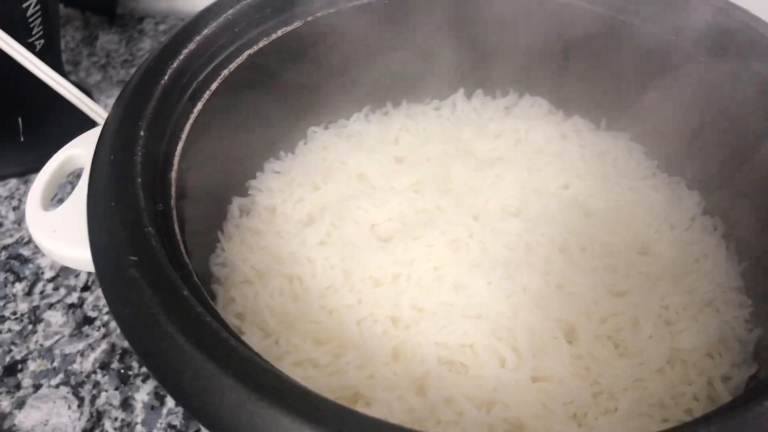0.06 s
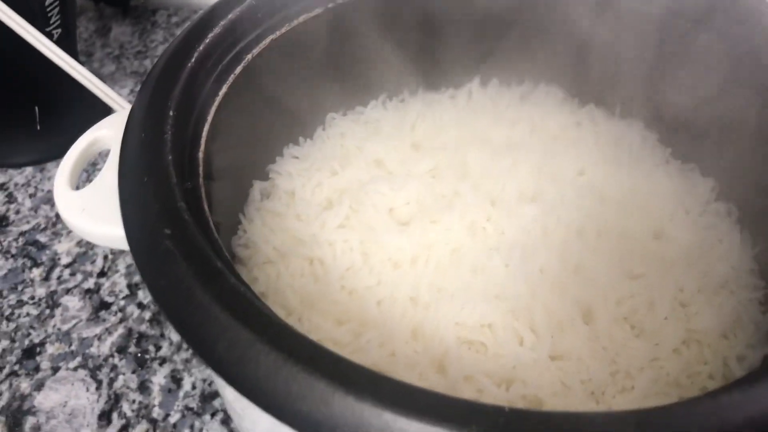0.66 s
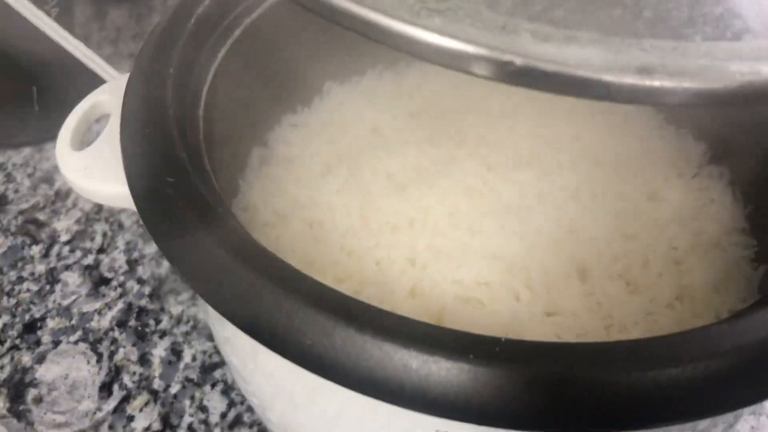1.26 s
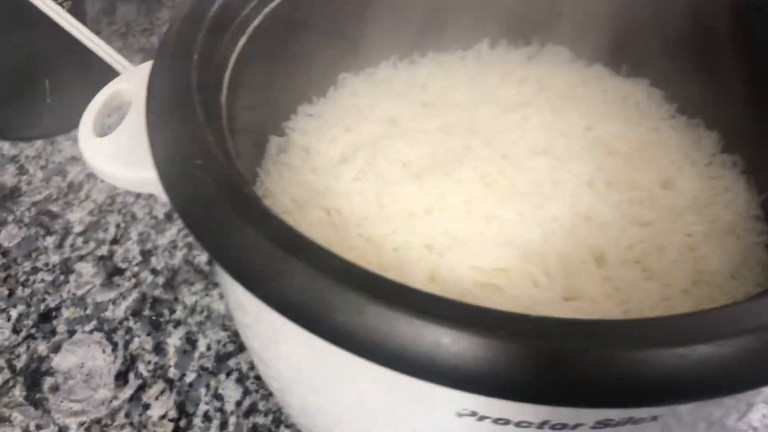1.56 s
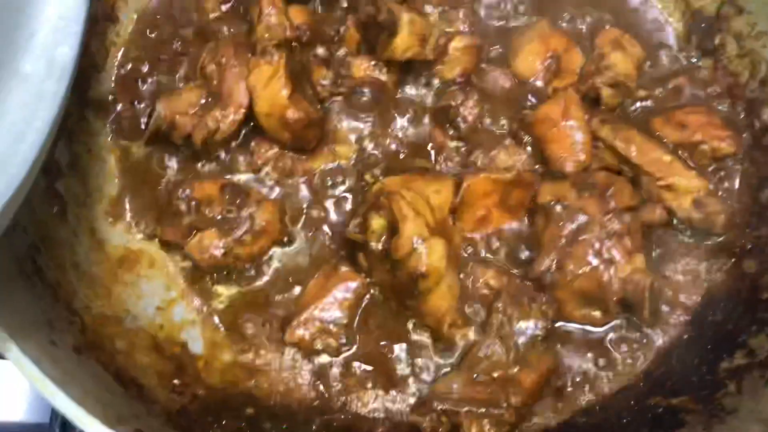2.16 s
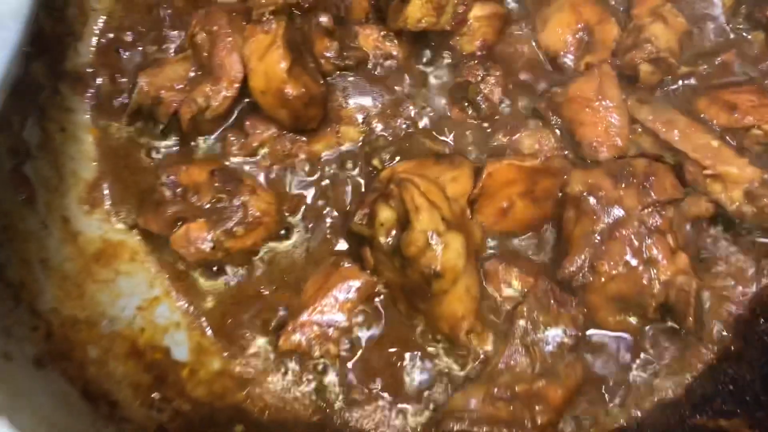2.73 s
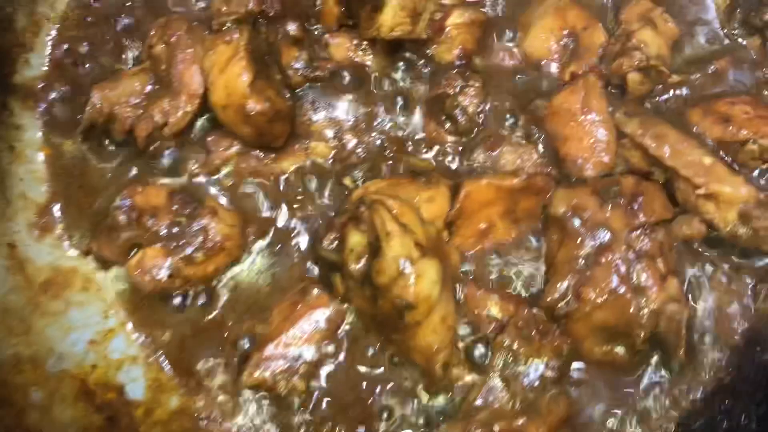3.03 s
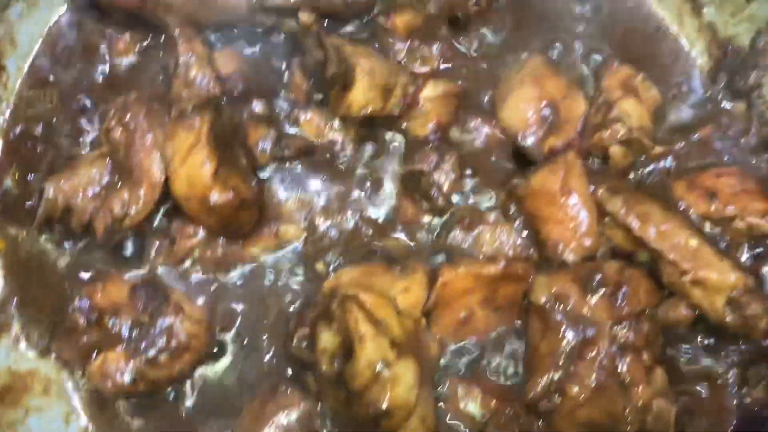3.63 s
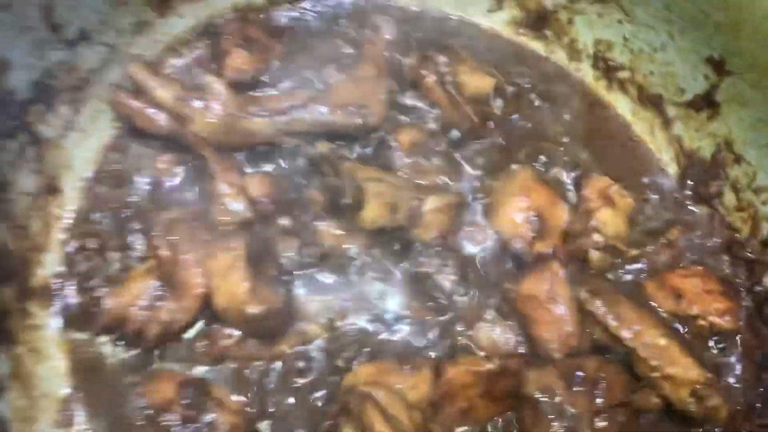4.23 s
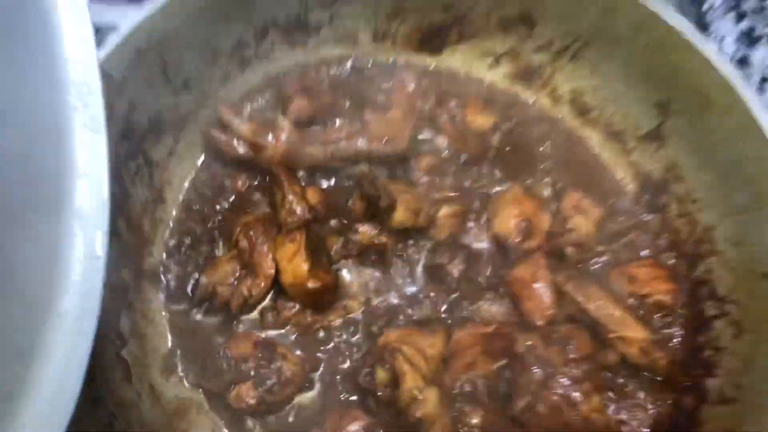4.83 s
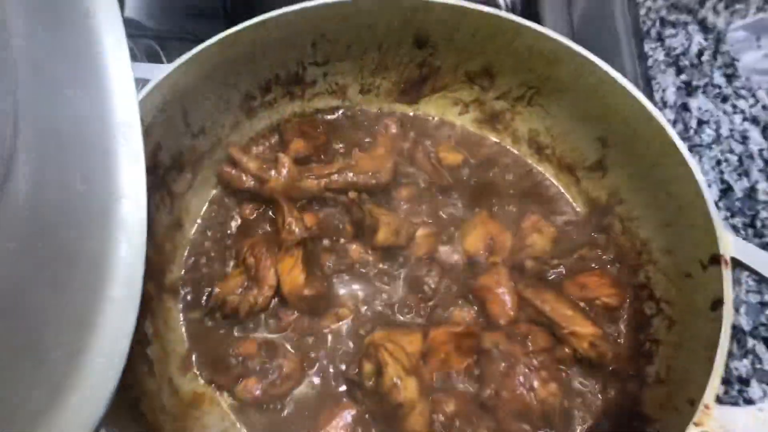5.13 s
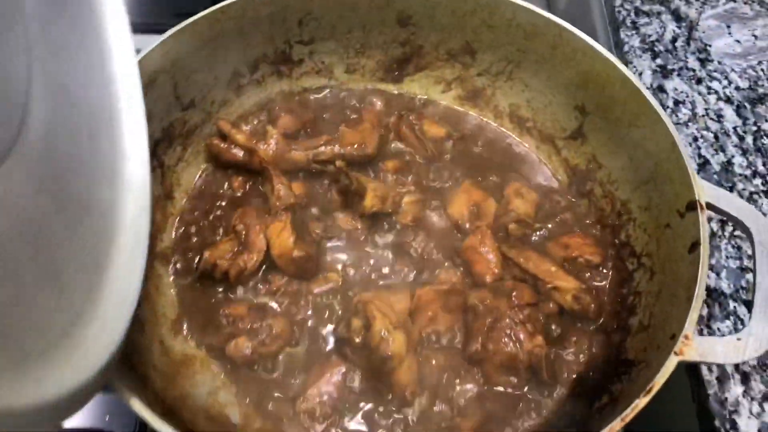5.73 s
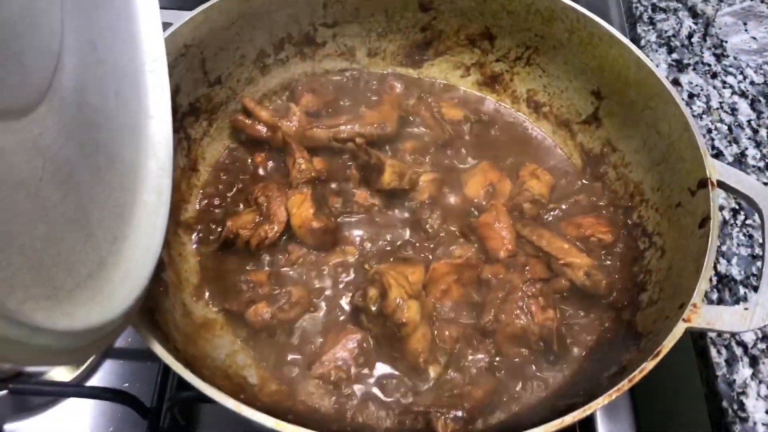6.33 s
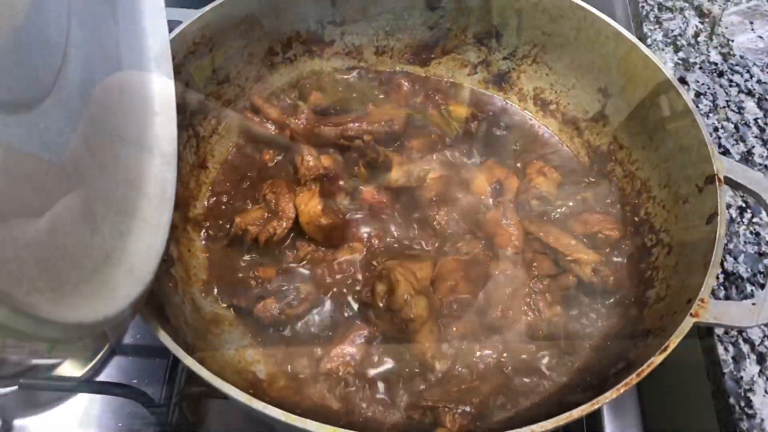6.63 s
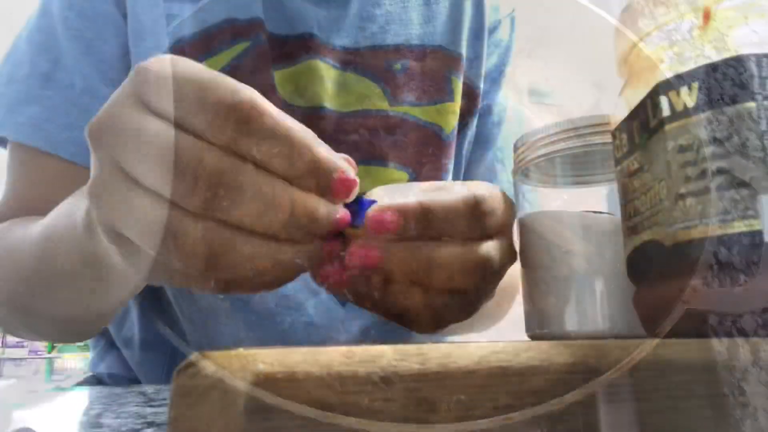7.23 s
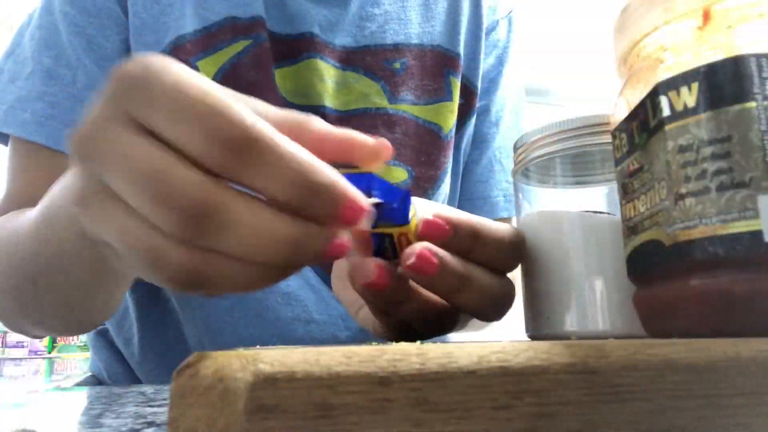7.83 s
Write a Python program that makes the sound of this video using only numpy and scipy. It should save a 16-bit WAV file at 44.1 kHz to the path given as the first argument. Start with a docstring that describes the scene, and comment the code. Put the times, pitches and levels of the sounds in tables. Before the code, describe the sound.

A low fan hum and a soft rush of steam from a rice cooker open the scene in a home kitchen. Light ticks come at about 0.4 and 0.7 seconds. The lid gives a short knock near 1.3 seconds, followed by another tick and a brief, soft swish at 1.6 seconds. Around 2 seconds the sound crosses over to chicken stew simmering in an open pot, and the hum grows stronger and more rumbling. Thick sauce burbles steadily with an occasional small plop, while fat fizzes and crackles. From about 2.8 to 4.5 seconds the microphone is close over the pot, so the sizzle is brighter and slightly louder, with several sharp spits. It draws back around 5 seconds and the sizzle softens. A few low plops come just after 6 seconds, then everything fades from 6.4 seconds to silence at about 7.4 seconds.

```python
"""A fan hums in a home kitchen while a rice cooker steams quietly, with light ticks, then a knock and a
swish as its lid is moved. Near 2 s the scene slides over to an open pot of chicken stew: steam burbles
through thick sauce, and water flashing off in the fat fizzes and spits. Nearby walls and the air in the
pot colour the sound as the microphone leans in, then draws back. From about 6.4 s everything fades out."""
import sys
import numpy as np
from scipy import signal
from scipy.fft import rfft, irfft, next_fast_len
from scipy.io import wavfile
from scipy.ndimage import map_coordinates

SR = 44100
rng = np.random.default_rng(int(sys.argv[2]) if len(sys.argv) > 2 else 0)


def master_out(mix):
    """Clip the mix to full scale and print it as 16-bit PCM to the path in sys.argv[1]."""
    frames = np.transpose(np.atleast_2d(mix))
    ceiling = np.clip(frames, -1, 1)
    pcm = np.round(ceiling * 32767).astype(np.int16)
    wavfile.write(sys.argv[1], SR, pcm)


N = 352121

SLIDE_S, DRAW_BACK_S, FADE_S = (1.72, 2.084), (4.8, 5.3), (6.43, 7.416)  # each (start [s], end [s])
# fan and mains lines: (frequency [Hz], level by the cooker [dB], level by the stove [dB], waver [dB])
HUM_LINES = [(58.9, -57.5, -65, 3.5), (75.7, -68, -53.5, 1.2), (119.85, -48, -39.5, 1.7)]
# rumble of the air moved by the fan: (frequency [Hz], relative level [dB])
FAN_SPECTRUM = [(25, -45), (36, -28), (46, -15.5), (58, -1.5), (92, -3.5), (106, -3), (126, 5.5),
                (155, -10), (220, -9.5), (400, -50.5)]
# kitchen air and steam: (frequency [Hz], relative level [dB])
KITCHEN_SPECTRUM = [(22, -40), (36, -13), (48, -8.5), (90, -4), (114, -7), (148, -7.5), (250, -6.5),
                    (400, -10.5), (750, -16), (2070, -19), (4660, -23), (7200, -31.5), (10500, -41),
                    (12300, -48), (15700, -54)]
# resonances around the rice cooker: (frequency [Hz], width [Hz], lift [dB])
COOKER_RESONANCES = [(253, 27, -4.5), (306, 82, 3.5), (413, 47, -3.5), (586, 62.4, 7), (2020, 200, 1.5),
                     (2715, 200, -1.5)]
# light ticks at the rice cooker: (time [s], peak level [dB], centre frequency [Hz])
COOKER_TICKS = [(.3615, -34.5, 4970), (.679, -33, 1200), (1.379, -35, 3030)]
# the knock of the lid: (frequency [Hz], relative level [dB])
LID_SPECTRUM = [(150, -10), (550, 4), (2200, 2.5), (3000, -7), (5800, -6), (8000, -17), (15000, -30)]
# worktop and wall reflections: (delay [s], gain [dB])
WALL_ECHOES = [(.0044, -21), (.0075, -22), (0.0114, -15.5), (0.0143, -20.5)]
# the microphone leans in over the pot, then draws back: (time [s], closeness [0-1])
MIC_CLOSENESS = [(2.05, 0.2), (2.55, .5), (2.85, 0.98), (4.55, .6), (5.25, .15), (6.45, 0.04)]
# burbling sauce: (frequency [Hz], relative level [dB])
BURBLE_SPECTRUM = [(90, -38), (150, -5), (190, 0), (300, -0.5), (420, -8), (650, -9), (1000, -12),
                   (2000, -14), (3000, -16), (5000, -23), (9000, -49)]
# resonances of pot and hob: (frequency [Hz], width [Hz], lift [dB])
POT_RESONANCES = [(359, 32, 4), (482, 90, -0.5), (575, 39, 6), (1497, 140, -1), (1860, 460, 1),
                  (2920, 260, 1.5), (3130, 290, -1.5)]
# larger bubbles breaking in the sauce: (time [s], relative level [dB], pitch [Hz])
SAUCE_PLOPS = [(3.699, -28, 265), (4.507, -34, 280), (6.249, -33, 242), (6.305, -29, 277),
               (6.427, -34, 336)]
# fizzing fat: (frequency [Hz], relative level [dB])
SIZZLE_SPECTRUM = [(800, -29), (2000, -10), (3200, -4), (4300, -1.5), (6200, -1.5), (8000, -7.5),
                   (10000, -15), (12500, -23.5), (16000, -43)]
# fine spray of droplets: (frequency [Hz], relative level [dB])
SPRAY_SPECTRUM = [(5000, -35.5), (8000, 0.5), (10000, 4), (12500, -0.5), (16000, -4)]
# the loudest spits of fat: (time [s], relative level [dB], pitch [Hz])
LOUD_SPITS = [(2.8454, -27.5, 5480), (3.0579, -28.5, 5480), (3.5723, -24, 4840), (3.8721, -23.5, 3920),
              (4.0243, -26.5, 4220), (4.0607, -24.5, 4960), (4.3246, -26, 4640), (4.5296, -29, 4260)]
# the pot's air resonance as heard from the moving microphone: (time [s], frequency [Hz])
CAVITY_PITCH = [(3.75, 1280), (4.1, 895), (4.8, 862), (5.2, 730)]
# resonances heard with the whole pot in front of the microphone: (frequency [Hz], width [Hz], lift [dB])
FAR_RESONANCES = [(416, 36, 4), (1470, 270, -2), (1687, 96, 5), (1970, 65, 4.5), (2320, 130, -2.5),
                  (3830, 60, 3), (4300, 117, 2.5)]

BURBLE_DB, SIZZLE_DB, SPRAY_DB = -38, -47.53, -72  # levels with the microphone drawn back
BURBLE_NEAR_DB, SIZZLE_NEAR_DB, SPRAY_NEAR_DB = 0.73, 4, 14  # gain close up: finer sounds gain more


def amp(db):
    """Amplitude ratio of a level in decibels."""
    return 10 ** (np.asarray(db) / 20)


def unit(x):
    """Normalisation to rms 1."""
    return x / np.sqrt(np.mean(x ** 2) + 1e-20)


def clock():
    """Uniform sampling: the time of every sample in seconds."""
    return np.arange(N) / SR


def curve(rows, t):
    """Linear interpolation of (time, value) rows at times t."""
    return np.interp(t, *np.transpose(rows))


def ramp(span):
    """A linear rise from 0 to 1 across the span."""
    return np.interp(clock(), span, [0, 1])


def wobble(rate):
    """Random modulation: a smooth curve with rate knots a second."""
    return map_coordinates(rng.standard_normal(int(N * rate / SR) + 4), [clock() * rate])


def bell(x, centre, width):
    """A Gaussian of height 1."""
    return np.exp(-.5 * ((x - centre) / width) ** 2)


def noise():
    """White noise: equal mean power at every frequency."""
    return rng.standard_normal(N)


def filtered(x, response):
    """Linear filtering: the spectrum of x times a frequency response."""
    size = next_fast_len(N + 8192)
    return irfft(rfft(x, size) * response(np.fft.rfftfreq(size, 1 / SR)), size)[:N]


def lift_db(hz, resonances):
    """Resonance peaks and dips, added in decibels."""
    return sum(db * bell(hz, centre, width / 2) for centre, width, db in resonances)


def coloured(x, spectrum, resonances=()):
    """Source and filter: x shaped by a spectral envelope and resonances, at rms 1."""
    points_hz, db = np.transpose(spectrum)
    envelope_db = lambda hz: np.interp(np.log(hz + 1), np.log(points_hz), db)
    return unit(filtered(x, lambda hz: amp(envelope_db(hz) + lift_db(hz, resonances))))


def fan(at_stove):
    """Periodic forcing by mains and rotor gives wavering lines; by the stove, moving air adds a rumble."""
    t, lines = clock(), 0
    for hz, cooker_db, stove_db, waver_db in HUM_LINES:
        level = amp(cooker_db) * (1 - at_stove) + amp(stove_db) * at_stove
        waver = amp(waver_db * wobble(13))
        lines += level * waver * np.sqrt(2) * np.sin(2 * np.pi * hz * t + 0.231 * wobble(6))
    return lines + at_stove * amp(-44.5) * coloured(noise(), FAN_SPECTRUM)


def tap(start, spectrum, t60=.02):
    """A damped transient: coloured noise decaying exponentially, with peak 1."""
    age = clock() - start
    burst = coloured(noise() * (age >= 0) * amp(-60 * np.abs(age) / t60), spectrum)
    return burst / np.abs(burst).max()


def rice_cooker():
    """Broadband noise of air and steam, under transients: light ticks, then the lid's knock and swish."""
    air = amp(-42.5) * coloured(noise(), KITCHEN_SPECTRUM, COOKER_RESONANCES)
    ticks = sum(amp(db) * tap(start, [(hz / 4, -12), (hz, 0), (hz * 2, -9), (hz * 5, -34)])
                for start, db, hz in COOKER_TICKS)
    knock = amp(-25) * tap(1.2685, LID_SPECTRUM)
    swish = coloured(noise(), [(300, -22), (900, -4), (2200, -3), (3200, -9.5), (8000, -38)],
                     resonances=[(2010, 870, 5)])
    return air + ticks + knock + amp(-45) * bell(clock(), centre=1.61, width=.04) * swish


def walls(x):
    """Reflection: close surfaces return weak copies, but are too small to reflect long bass waves."""
    echoes = lambda hz: sum(amp(db) * np.exp(-2j * np.pi * hz * delay) for delay, db in WALL_ECHOES)
    return filtered(x, lambda hz: 1 + echoes(hz) * hz / np.hypot(hz, 450))


def bursts(times, peaks, hz, cycles, rise, samples):
    """Damped oscillation: each bursting bubble rings for a few cycles while its pitch climbs."""
    age = hz[:, None] * np.arange(samples) / SR  # in cycles
    decay = age / cycles
    envelope = (1 - np.exp(-2 * age)) * np.exp(-decay)
    ring = envelope * np.sin(2 * np.pi * age * (1 + rise * np.tanh(decay)))
    ring *= (peaks / np.abs(ring).max(axis=1))[:, None]
    at = (times * SR).astype(int)[:, None] + np.arange(samples)
    return np.bincount(at.ravel(), ring.ravel(), N)[:N]


def swarm(rate, low_hz, high_hz, spread_db, cycles, rise, samples):
    """Incoherent superposition: bubbles at random moments, many weak and few strong, at rms 1."""
    when, pitch, strength = rng.random((int(rate * N / SR), 3)).T
    hz = low_hz * (high_hz / low_hz) ** pitch
    peaks = amp(-spread_db * np.log(strength * .99 + .01)) * hz / high_hz  # the tilt evens the spectrum
    return unit(bursts(when * N / SR, peaks, hz, cycles, rise, samples))


def burble(level_db):
    """Bubble resonance: steam pushes through thick sauce with a rush, dense low bubbles and a few plops."""
    bubbles = swarm(rate=320, low_hz=220, high_hz=1288, spread_db=0.9, cycles=1.68, rise=0.12, samples=1000)
    level = amp(level_db + 0.28 * wobble(5))
    rush = coloured(noise() + amp(-15.5) * bubbles, BURBLE_SPECTRUM, POT_RESONANCES)
    times, db, hz = np.transpose(SAUCE_PLOPS)
    return level * rush + bursts(times, amp(db - 4), hz, cycles=2.7, rise=.1, samples=2500)


def sizzle(fizz_db, spray_db):
    """Flash boiling of water in fat: countless tiny bursts merge to a fizz, the larger ones crackle."""
    crackle = swarm(rate=1200, low_hz=3220, high_hz=11800, spread_db=3.5,
                    cycles=2.3, rise=0.054, samples=160)
    fizz = coloured(noise() + amp(-4 + 1.8 * wobble(24)) * crackle, SIZZLE_SPECTRUM)
    droplets = swarm(rate=900, low_hz=7800, high_hz=15400, spread_db=6, cycles=1.8, rise=.02, samples=64)
    spray = coloured(noise() + amp(-6) * droplets, SPRAY_SPECTRUM)
    return amp(fizz_db + 0.22 * wobble(10)) * fizz + amp(spray_db + 1.7 * wobble(42)) * spray


def spits(strays_per_s=7, usual_hz=5180, scatter_octaves=.3):
    """Impulsive excitation: a bubble of fat snaps and a weaker one follows; lesser spits fall at random."""
    count = int(strays_per_s * N / SR)
    stray_times = rng.random(count) * N / SR
    strength, pitch = rng.standard_normal((count, 2)).T
    stray_db = -36 + SIZZLE_NEAR_DB * curve(MIC_CLOSENESS, stray_times) + 2 * strength
    stray_hz = usual_hz * 2 ** (scatter_octaves * pitch)
    times, db, hz = np.hstack([np.transpose(LOUD_SPITS), [stray_times, stray_db, stray_hz]])
    delay, detune = rng.random((len(times), 2)).T
    first = bursts(times + .0005, amp(db - 2), hz, cycles=3, rise=.03, samples=256)
    second = bursts(times + .001 + .0033 * delay, amp(db - 3.5), hz * (.8 + .5 * detune),
                    cycles=2.1, rise=.03, samples=256)
    return first + second


def pot_cavity(x):
    """Cavity resonance: the pot's air lifts one band; as the microphone retreats it sinks, others enter."""
    hz, t, spectra = signal.stft(x, SR, nperseg=2048)
    centre_hz = curve(CAVITY_PITCH, t)
    away = np.interp(t, DRAW_BACK_S, [0, 1])
    near_db = 4 * (1 - .45 * away) * bell(hz[:, None], centre_hz, width=.09 * centre_hz)
    far_db = away * lift_db(hz[:, None], FAR_RESONANCES)
    return signal.istft(spectra * amp(near_db + far_db), SR, nperseg=2048)[1][:N]


def stew():
    """Superposition of sauce, fat and spits in the open pot, brighter the closer the microphone comes."""
    close = curve(MIC_CLOSENESS, clock())
    sauce = burble(BURBLE_DB + BURBLE_NEAR_DB * close)
    fat = sizzle(SIZZLE_DB + SIZZLE_NEAR_DB * close, SPRAY_DB + SPRAY_NEAR_DB * close)
    return pot_cavity(sauce + fat + spits())


def scene():
    """A crossfade from the rice cooker to the stew; the fan runs throughout."""
    at_stove = ramp(SLIDE_S)
    cooking = np.sqrt(1 - at_stove) * rice_cooker() + at_stove * stew()
    return (walls(cooking) + fan(at_stove))[None]


def record(dry):
    """A linear closing fade and an ideal low-pass filter."""
    return filtered(dry[0] * (1 - ramp(FADE_S)), lambda hz: hz < 15720)[None]


dry = scene()
out = record(dry)
master_out(out)
```